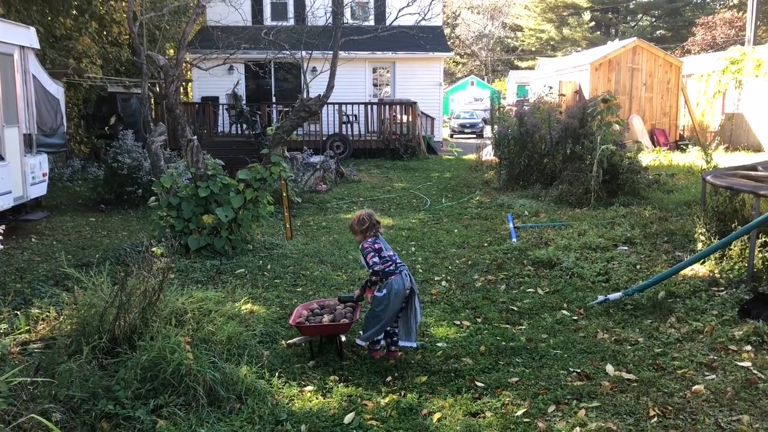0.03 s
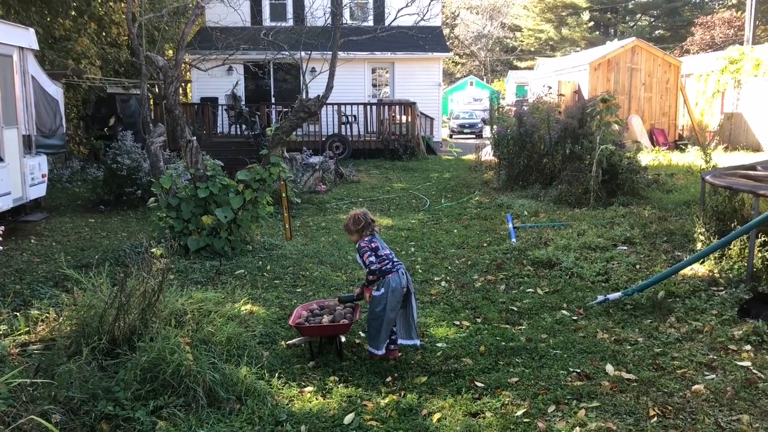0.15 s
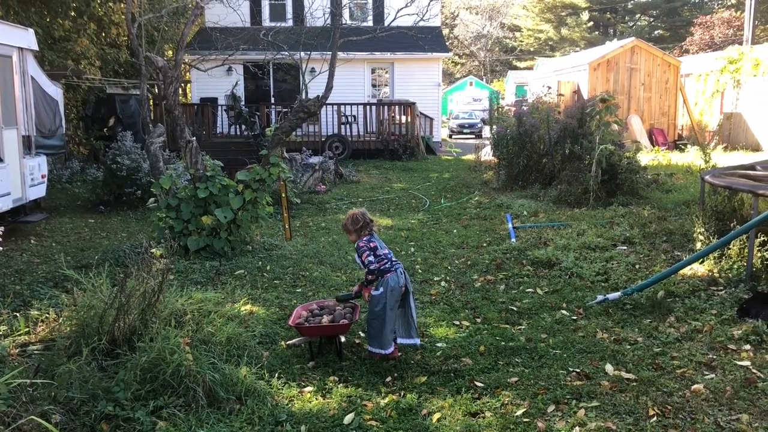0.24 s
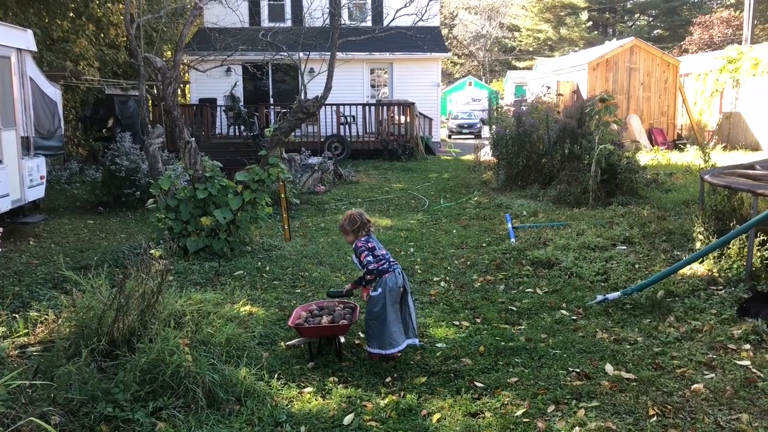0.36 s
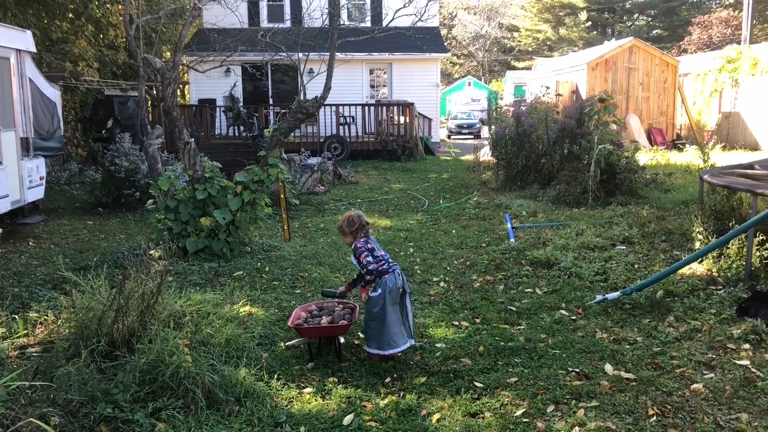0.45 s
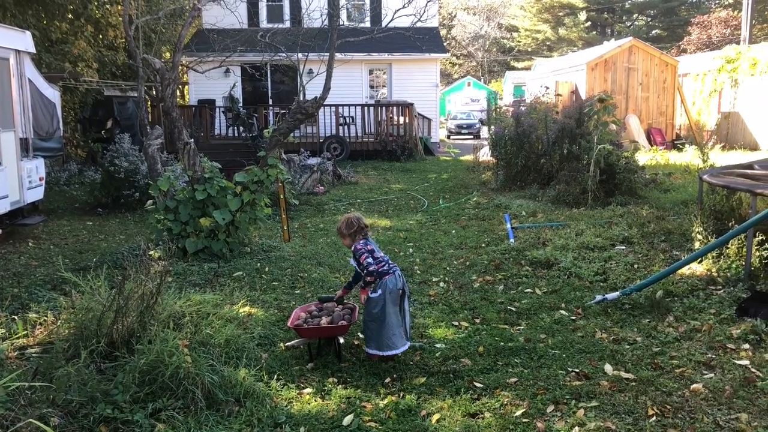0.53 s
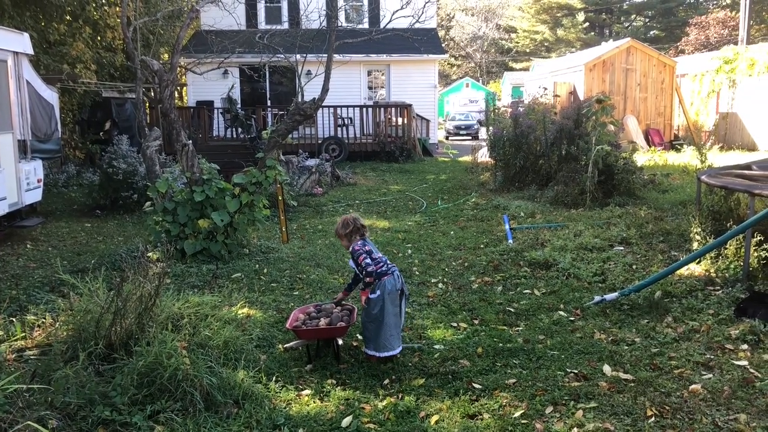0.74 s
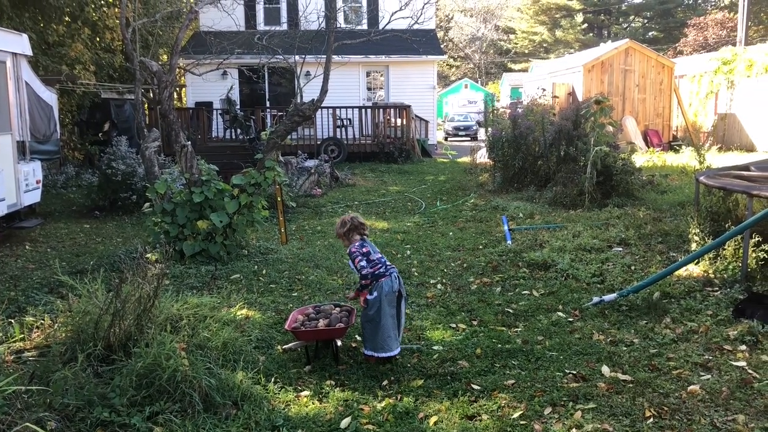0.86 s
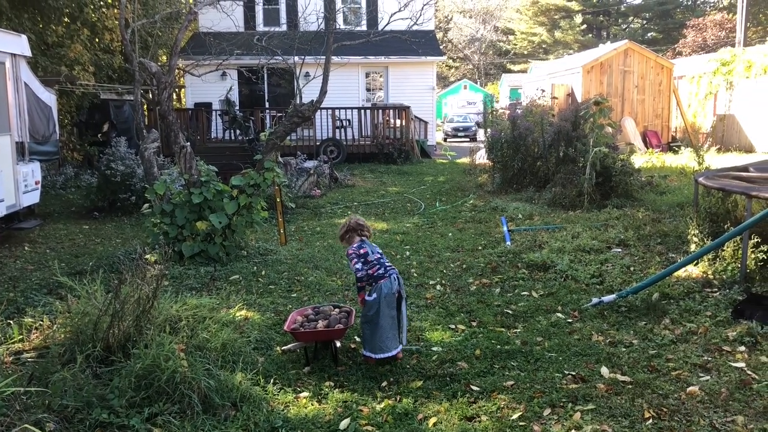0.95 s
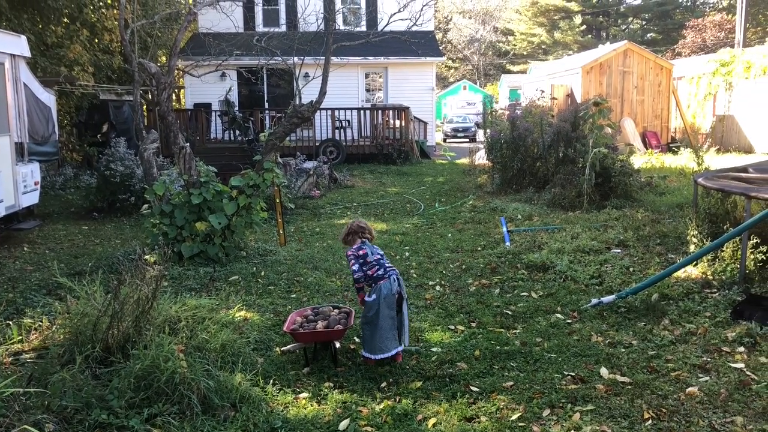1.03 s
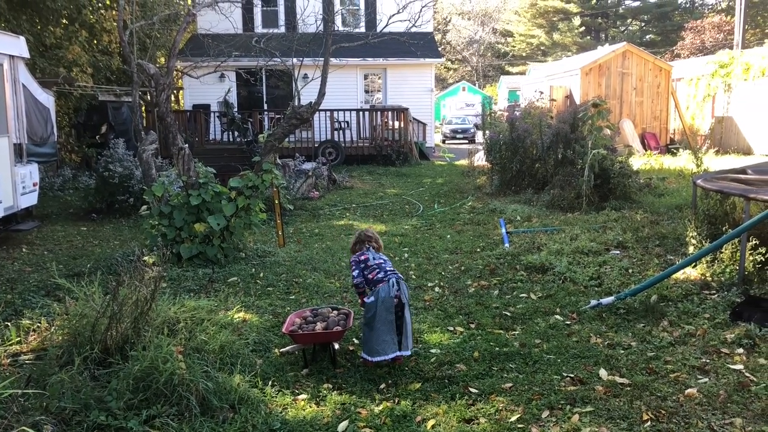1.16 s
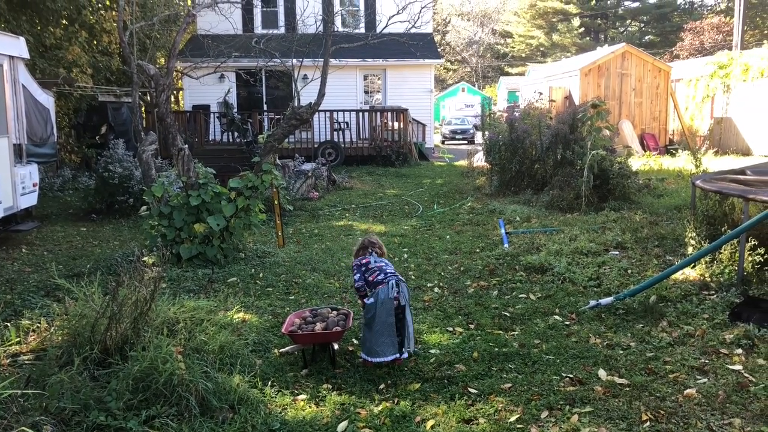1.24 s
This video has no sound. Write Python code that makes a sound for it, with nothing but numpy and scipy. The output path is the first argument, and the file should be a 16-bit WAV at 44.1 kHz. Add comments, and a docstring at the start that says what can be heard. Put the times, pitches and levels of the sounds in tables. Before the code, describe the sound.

Wood pieces land twice in a loaded wheelbarrow, cracking sharply as the tray rings faintly.

```python
"""Over quiet outdoor noise, a hard piece, probably firewood, drops on the load of a small wheelbarrow.
At 0.2 s it touches, cracks down and settles; the metal tray rings faintly and booms a moment later.
Near 0.65 s the barrow gives a dull knock, and at 0.9 s a second piece lands and shakes the tray again.
House, sheds and trees of the back yard scatter each blow into a short reverberation."""
import sys
import numpy as np
from scipy import signal
from scipy.fft import rfft, irfft
from scipy.io import wavfile

SR = 44100
rng = np.random.default_rng(int(sys.argv[2]) if len(sys.argv) > 2 else 0)


def int16_out(signal):
    """Quantize to a 16-bit WAV file."""
    q = np.round(np.clip(np.atleast_2d(signal).T, -1, 1) * 32767)
    wavfile.write(sys.argv[1], SR, q.astype(np.int16))


N = 57330
T = np.arange(N) / SR
HZ = np.maximum(np.fft.rfftfreq(N, 1 / SR), 1)

# Contacts of piece and load (time [s], level [dB], treble tilt [dB per half octave], rise [s],
# crack t60 [s], load ring re level [dB], piece ring re level [dB], yard feed re level [dB])
CONTACTS = [(0.2024, -20, -2, 0.0045, 0.086, -9, -27, 2),
            (0.2147, -11.5, 0.48, 0.00041, 0.028, -31, 0, -3.5),
            (0.2286, -28.5, 0, .002, 0.046, -18.5, -14.5, 5), (.2890, -33, -2.5, 0.0036, 0.1, -15, -25, -1),
            (0.8909, -28.5, -3.5, 0.0043, 0.18, 2.5, -12, -7.5),
            (0.901, -19, 1, 0.00081, 0.058, -11, -13, -2),
            (0.9092, -26.5, -10, 0.00044, 0.072, -7, 4, -1.5),
            (0.9548, -38.5, -12.5, .003, 0.067, -1, -16, -3),
            (0.9635, -27, -3, 0.00018, .028, -1.5, -11, -1)]
# Spectrum of a contact (frequency [Hz], relative density [dB])
CRACK_SPECTRUM = [(80, -28.5), (200, -8.5), (360, -6), (680, -6), (1100, -2.5), (2000, 1.5), (3400, 1),
                  (5500, 2), (7600, -4.5), (10000, -7), (15500, -10)]
# Modes of load, piece, tray and knocked barrow (frequency [Hz], relative level [dB], t60 [s])
LOAD_MODES = [(1230, -7, .035), (1533, -2.5, 0.057), (1752, -1.5, 0.033), (2104, 1, 0.04),
              (2490, -1.5, .04), (4350, -10, 0.047)]
PIECE_MODES = [(965, -13, .025), (1328, -9.5, .03), (2744, -19, 0.043), (3400, -6, 0.046),
               (5170, -11, 0.0222), (5170, -7.5, .028), (5260, -6, 0.036), (8290, -10.5, 0.039),
               (8920, -5.5, 0.032), (8040, -10, 0.018), (9050, -8.5, 0.075)]
TRAY_MODES = [(1295, -17, 1.0), (1344, -14, 1), (2477, -10.5, 0.55), (2970, 0, 0.75), (2954, -3, 0.6),
              (3040, -7.5, 0.71), (4926, -8.5, .4)]
TRAY_BOOM_MODES = [(124.7, 2, 0.39), (93, -12, 0.304), (185.6, 0, 0.087)]
BARROW_MODES = [(334, -4, 0.082), (1015, -7, 0.12), (1127, 1, 0.13), (1255, -12, 0.27)]
# Excitations of the tray (time [s], ring level [dB], boom level [dB])
TRAY_SHAKES = [(.215, -34, -43.5), (.903, -42, -41.5)]
# Dull knocks on the barrow (time [s], level [dB])
BARROW_KNOCKS = [(.651, -43), (0.67, -42.5), (.690, -58.5), (0.726, -61), (0.784, -66)]
# Spectrum of a knock (frequency [Hz], relative density [dB])
THUD_SPECTRUM = [(60, 0.5), (130, 3), (400, 4), (560, 0), (800, 3.5), (1150, 0), (1450, -11), (2400, -8),
                 (5000, -30), (15000, -42)]
# Reverberation of the yard (frequency [Hz], gain [dB], t60 [s])
YARD_SCATTER = [(100, -6.5, 0.79), (296, -2.5, 0.2), (660, -2.5, 0.35), (1300, -5.5, .8), (2130, -5.5, .66),
                (3384, -3, 0.61), (5030, -5, 0.47), (9040, -4, 0.33), (15000, -12.5, .29)]
# Distant outdoor noise (frequency [Hz], relative density [dB])
OUTDOOR_SPECTRUM = [(20, -16), (45, -3.5), (70, -4), (130, -2.5), (280, -10), (600, -13), (1200, -15.5),
                    (2500, -24), (4800, -23.5), (7000, -34), (15500, -38.5)]
# Rustles and thin hisses (peak time [s], length [s], centre [Hz], half-width [octaves], level [dB])
RUSTLE_BANDS = [(0.071, 0.11, 9100, 0.76, -65.5), (0.162, .07, 1720, .13, -65),
                (0.193, 0.022, 880, 1.04, -56), (0.83, 0.45, 4720, 0.021, -73.5),
                (1.129, 0.039, 10900, .7, -66), (1.26, 0.024, 13050, .5, -74.5)]


def drops():
    """Impact excitation: each contact cracks and rings load and piece; gives direct sound and yard feed."""
    tilt_corner_hz, ring_to_yard_db = 2850, -5
    grind_s = 0.002  # the surfaces grind briefly before the crack dies away
    direct = to_yard = 0
    for start, db, tilt_db, rise, t60, load_db, piece_db, yard_db in CONTACTS:
        spectrum = along(CRACK_SPECTRUM, HZ) + tilt_db * np.log2(1 + (HZ / tilt_corner_hz) ** 2)
        crack = place(noise(spectrum) * fade(t60, grind_s), start, rise)
        modes = undb(load_db) * ring(LOAD_MODES) + undb(piece_db) * ring(PIECE_MODES)
        rings = place(modes, start, rise)
        direct += undb(db) * (crack + rings)
        to_yard += undb(db + yard_db) * (crack + undb(ring_to_yard_db) * rings)
    return direct, to_yard


def tray():
    """Free vibration: after each drop the tray's high modes sing and its low modes swell into a boom."""
    boom_lag_s = 0.015
    out = 0
    for start, ring_db, boom_db in TRAY_SHAKES:
        out += undb(ring_db) * place(ring(TRAY_MODES), start, rise_s=0.021)
        out += undb(boom_db) * place(ring(TRAY_BOOM_MODES), start + boom_lag_s, rise_s=0.019)
    return out


def knocks():
    """Soft impacts carry little treble: the barrow thuds, with a hollow ring on the stronger knocks."""
    loudest_db = max(db for _, db in BARROW_KNOCKS)
    out = 0
    for start, db in BARROW_KNOCKS:
        thud = noise(along(THUD_SPECTRUM, HZ)) * fade(t60_s=0.12)
        hollow = undb((db - loudest_db) / 2) * ring(BARROW_MODES)
        out += undb(db) * place(thud + hollow, start, rise_s=0.0069)
    return out


def yard(sound):
    """Diffuse reflection: each band decays at its own rate, and one wall sends back a brief swell."""
    onset_s, wall_lag_s, wall_spread_s, wall_db = 0.0066, 0.079, 0.015, -5.5
    edges = np.geomspace(40, SR / 2, 21)
    white = rfft(rng.standard_normal(N))
    response = 0
    for low, high in zip(edges, edges[1:]):
        centre_hz = np.sqrt(low * high)
        decay = fade(along(YARD_SCATTER, centre_hz, column=2))
        band = irfft(white * (HZ >= low) * (HZ < high), N) * decay
        energy_share = (high - low) / (SR / 2)
        band *= np.sqrt(energy_share / np.sum(band ** 2))
        response += undb(along(YARD_SCATTER, centre_hz)) * band
    wall_swell = 1 + undb(wall_db) * np.exp(-((T - wall_lag_s) / wall_spread_s) ** 2)
    build_up = np.minimum(T / onset_s, 1) ** 2
    return signal.fftconvolve(sound, response * wall_swell * build_up)[:N]


def background():
    """Amplitude-modulated noise: a slowly wavering outdoor bed with a few faint band-limited rustles."""
    bed_db = -59.5
    waver_db = -1.5 * np.interp(T, np.linspace(0, T[-1], 12), rng.standard_normal(12))
    out = undb(bed_db + waver_db) * noise(along(OUTDOOR_SPECTRUM, HZ))
    for peak, length, centre_hz, octaves, db in RUSTLE_BANDS:
        spectrum = -10 * np.log10(1 + (np.log2(HZ / centre_hz) / octaves) ** 4)
        swell = np.exp(-(2 * (T - peak) / length) ** 2)
        out += undb(db) * noise(spectrum) * swell
    return out


def ring(modes):
    """Modal superposition: a sum of damped sinusoids of alternating sign."""
    return sum((-1) ** k * undb(db) * fade(t60) * np.sin(2 * np.pi * hz * T)
               for k, (hz, db, t60) in enumerate(modes))


def noise(spectrum_db):
    """Spectral shaping: white noise is filtered, then scaled to unit rms."""
    shaped = irfft(rfft(rng.standard_normal(N)) * undb(spectrum_db), N)
    return shaped / shaped.std()


def fade(t60_s, hold_s=0):
    """Exponential damping: after the hold, the level falls 60 dB in t60_s."""
    return np.exp(-np.log(1000) * np.maximum(T - hold_s, 0) / t60_s)


def place(sound, start_s, rise_s):
    """Onset: a linear rise, delayed to the start time."""
    attack = np.minimum(T / rise_s, 1)
    return np.concatenate([np.zeros(int(start_s * SR)), sound * attack])[:N]


def along(table, hz, column=1):
    """Interpolation of a table column over log frequency."""
    table = np.array(table)
    return np.interp(np.log(hz), np.log(table[:, 0]), table[:, column])


def undb(db):
    """Amplitude ratio of a level in decibels."""
    return 10 ** (np.asarray(db) / 20)


def scene():
    """Superposition: the barrow's direct sound, its reverberation and the background add in mono."""
    knock_to_yard_db = -18.5
    blows, blows_to_yard = drops()
    bumps = knocks()
    reverberation = yard(blows_to_yard + undb(knock_to_yard_db) * bumps)
    return (blows + bumps + tray() + reverberation + background())[None]


def record(dry):
    """Band limiting: filters remove the deep bass and the highest treble."""
    bottom_hz, top_hz = 42.2, 16000
    high_pass = signal.butter(3, bottom_hz, "high", fs=SR, output="sos")
    low_pass = signal.ellip(10, 0.2, 80, top_hz, fs=SR, output="sos")
    return signal.sosfilt(low_pass, signal.sosfilt(high_pass, dry))


dry = scene()
out = record(dry)
int16_out(out)
```